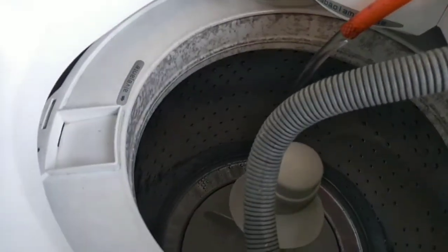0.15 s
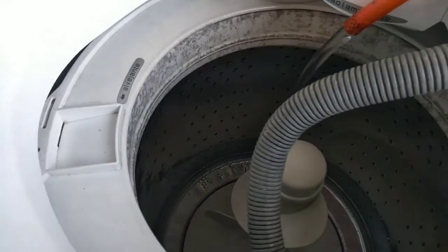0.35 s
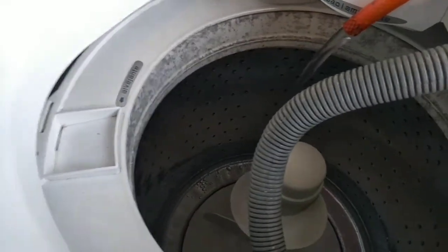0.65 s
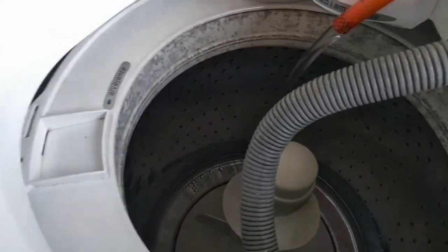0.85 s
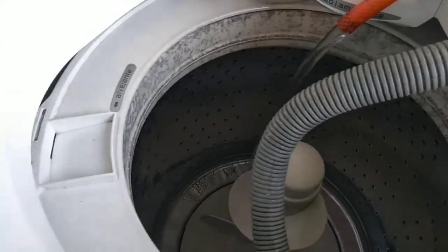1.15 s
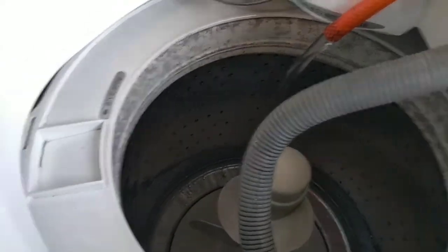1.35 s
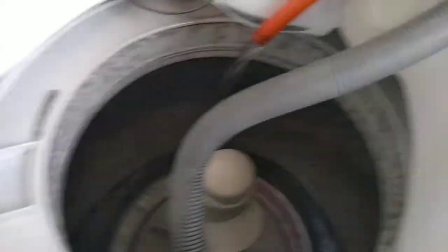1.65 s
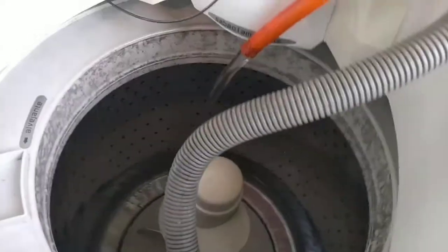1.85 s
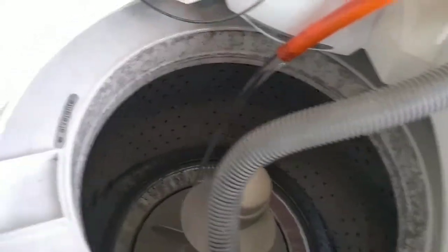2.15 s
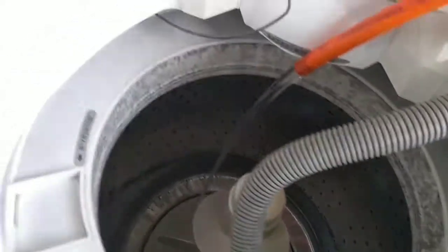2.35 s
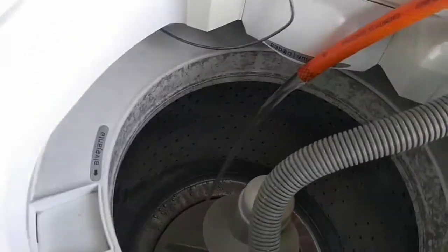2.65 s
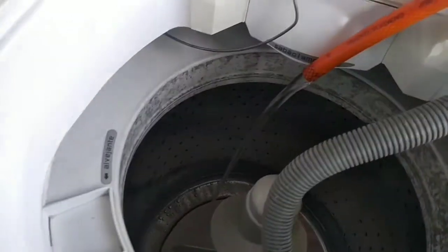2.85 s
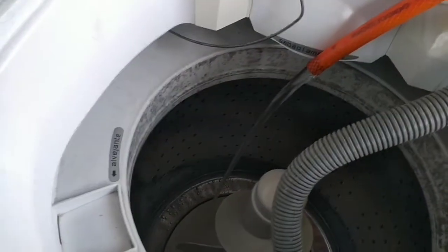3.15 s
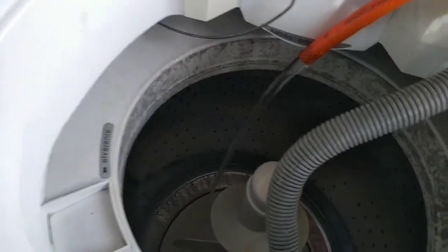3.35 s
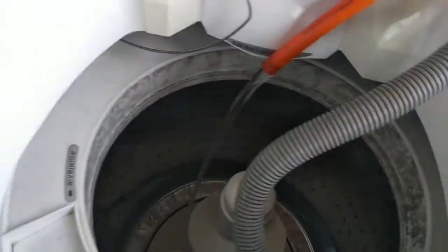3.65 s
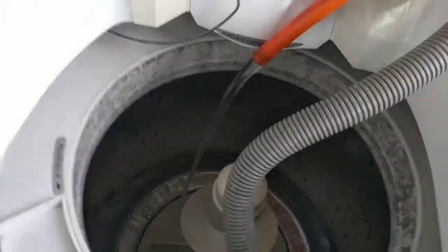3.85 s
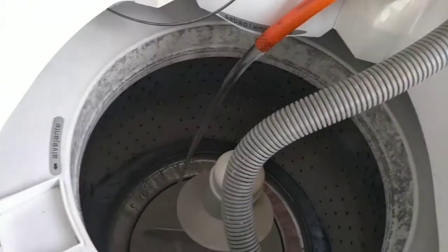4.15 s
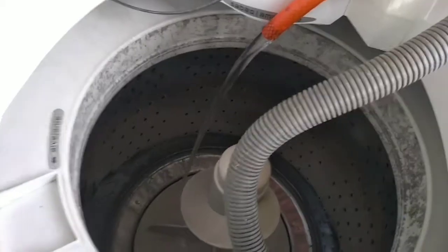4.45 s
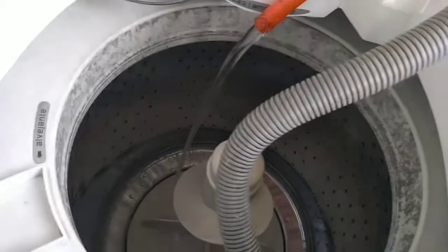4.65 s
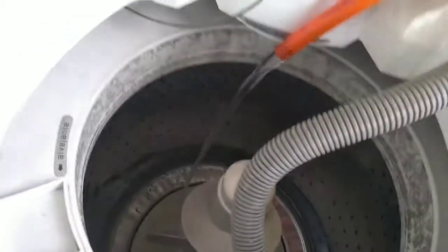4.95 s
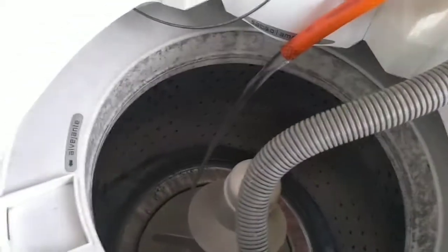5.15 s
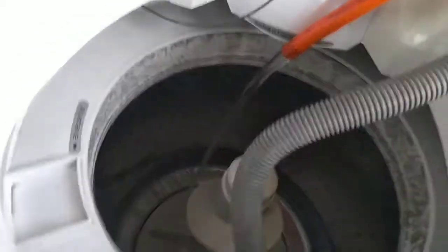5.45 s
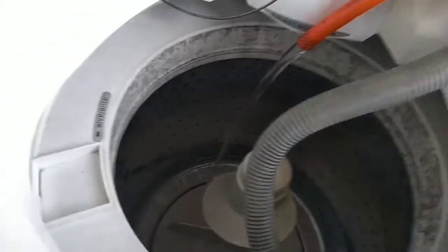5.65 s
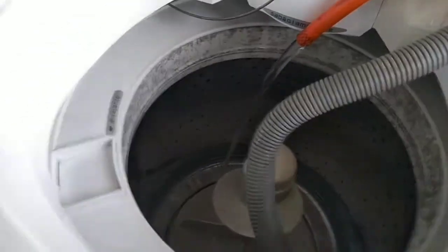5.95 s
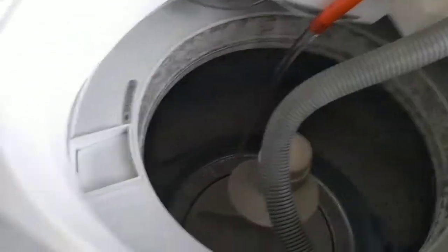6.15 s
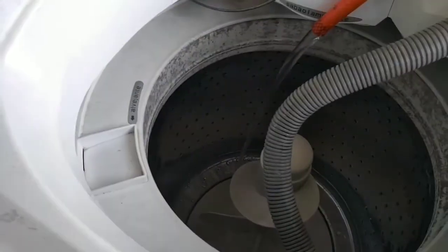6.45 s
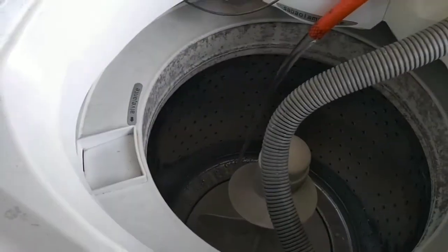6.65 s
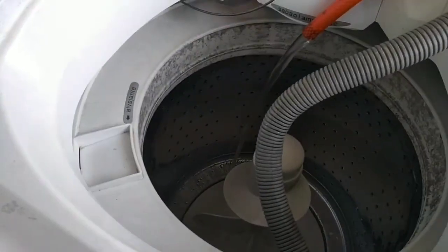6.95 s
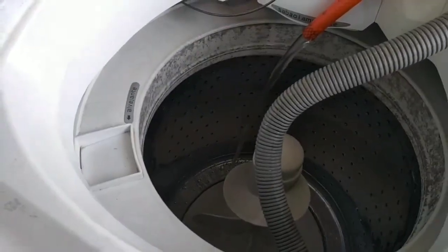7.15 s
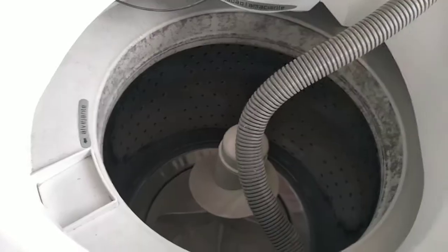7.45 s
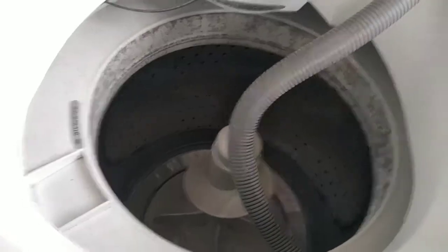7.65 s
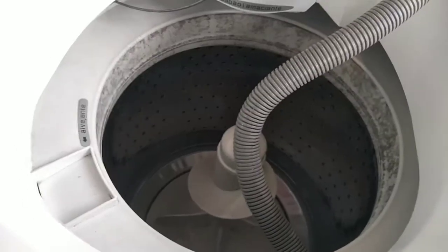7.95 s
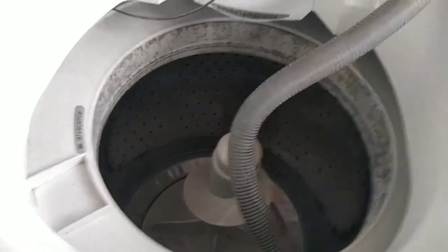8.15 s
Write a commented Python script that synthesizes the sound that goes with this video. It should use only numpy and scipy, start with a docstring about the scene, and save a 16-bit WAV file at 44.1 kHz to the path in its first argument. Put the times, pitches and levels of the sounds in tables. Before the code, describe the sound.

A hose jet splashes and gurgles loudly into a hollow washing tub, a bird chirping nearby, then breaks off abruptly to a quiet yard with whistles.

```python
"""Hose jet into a washing machine tub

Close at the tub: a hose jet pours into shallow water; plops, gulps, spray and bubbles ring the drum's air
modes. A bird nearby gives seven chirps, each a short note and a gliding flick, then whistles in pitch arches.
The sound breaks off into a near-silent moment; after it only the quiet yard is heard, with bird, two drips,
insect hiss, one pulsing insect and a low hum from far away. Two microphone ports, widened in the recorder."""
import sys
import numpy as np
from scipy import signal
from scipy.fft import rfft, irfft, next_fast_len
from scipy.io import wavfile
from scipy.ndimage import uniform_filter1d

SR = 44100
rng = np.random.default_rng(int(sys.argv[2]) if len(sys.argv) > 2 else 0)


def persist_wave(psi):
    """Save psi, clipped to +-1, as 16-bit WAV."""
    counts = np.round(np.clip(psi, -1, 1) * 32767).astype(np.int16)
    wavfile.write(sys.argv[1], SR, np.atleast_2d(counts).T)


N = 365588
T = np.arange(N) / SR
STOP_S, RESUME_S, FADE_S = 7.228, 7.303, 0.03  # the water has faded out; the yard returns; length of the fade
PORTS_S = 20.7 / SR  # sound travel time between the two microphone ports
SPRAY_T60_S = 0.11  # echo decay of spray and gurgle
SPRAY_ECHO_DB, PLOP_ECHO_DB, SONG_ECHO_DB = 0.5, -2.5, -3  # echoes relative to direct sound


# plop spectrum, before the plop levels: pitch_hz [Hz], level_db [dB per Hz]
PLOP_SPECTRUM = [(30, -81.5), (70, -74.5), (130, -70), (250, -85.5), (450, -83.5), (700, -83.5),
                 (1250, -91), (1700, -97.5), (2500, -95.5), (5000, -108), (14000, -125)]
# spray spectrum, before the spray levels: pitch_hz [Hz], level_db [dB per Hz]
SPRAY_SPECTRUM = [(200, -110), (1000, -87), (2000, -86), (2800, -88), (3300, -88.5), (4200, -82),
                  (5200, -87), (6000, -81.5), (6700, -83.5), (8200, -82.5), (9200, -88.5), (10200, -91.5),
                  (12000, -99), (14500, -100)]


def water():
    """Jet, large splashes, ringing drum, bubbles and a low rumble add up at the two ports."""
    spray_db, plunge_db, boom_db = swells()
    jet_spray, jet_plop = falling_jet(gain_of(spray_db), gain_of(plunge_db))
    big_spray, big_plop = splashes(spray_db=43.8, plop_db=68, scatter=0.22, fall_s=0.005, crack=0.6)
    big_spray = at_ports(big_spray, t60=SPRAY_T60_S, wet_db=SPRAY_ECHO_DB, lead_s=0.000255)
    big_plop = at_ports(big_plop, t60=0.12, wet_db=-2.5, lead_s=0.00006)
    spray = gain_of(-4.5) * jet_spray + big_spray
    plop = gain_of(0.5) * jet_plop + big_plop
    in_drum = drum(drops(per_s=700, spread_db=1), boom_db) + gulps()
    boom = at_ports(in_drum, t60=0.08, wet_db=-9, lead_s=0.00008)
    rumble_spectrum = [(25, -89.0), (100, -81.0), (250, -92.5), (700, -105), (3000, -130)]  # Hz, dB per Hz
    rumble = colour(rng.standard_normal((2, N)), rumble_spectrum)
    return colour(spray, SPRAY_SPECTRUM) + colour(plop, PLOP_SPECTRUM) + boom + gurgle() + rumble


PUFF_S = 0.006  # decay time of a puff of spray


def falling_jet(spray_gain, plunge_gain, spots=3):
    """The jet breaks into blobs that land on a few spots; each plops and throws up a puff of spray."""
    puff = np.exp(-np.arange(3000) / SR / PUFF_S)
    spray, plop = np.zeros((2, N)), np.zeros((2, N))
    for _ in range(spots):  # each spot has echoes of its own
        blobs = drops(per_s=30, spread_db=2)
        puffs = evened(convolve(abs(blobs), puff)[0])
        droplets = drops(per_s=1700, spread_db=4.5)
        patter = evened(droplets * (puffs + 0.65)) + 0.3 * blobs
        # the finest drops merge into a hiss
        patter = patter + 0.35 * rng.standard_normal(N)
        pings = pinged(patter, width_hz=570) * spray_gain
        spray += at_ports(pings, t60=SPRAY_T60_S, wet_db=SPRAY_ECHO_DB, lead_s=0.000317)
        lesser_blobs = drops(per_s=55, spread_db=3.5)
        plunge = 0.8 * blobs + 0.55 * lesser_blobs + 0.15 * rng.standard_normal(N)
        plop += at_ports(plunge * plunge_gain, t60=0.17, wet_db=PLOP_ECHO_DB, lead_s=0.00006)
    return spray / np.sqrt(spots), plop / np.sqrt(spots)


# the wandering jet: time_s [s], spray_swell_db [dB], boom_swell_db [dB]
JET_SWELLS = [(0.0, 1, 1.5), (0.9, -0.5, 3), (1.3, -1.5, 0), (1.9, -1.6, 0), (2.3, 1, -1.5), (2.6, 2.5, 1),
              (3.1, -0.5, -1), (3.7, 0, 1.5), (4.3, -0.5, -0.5), (5.1, 0.8, 3.5), (5.4, -1, -3),
              (5.8, 0.5, 0), (6.15, 0, -2.5), (6.38, 0, -2), (6.62, 0, -3.5), (7.2, 1, -4)]
PLUNGE_DB_PER_S = -0.88  # the jet's plops soften as the water deepens


def swells():
    """Spray and boom swell as the jet wanders, plops fade as the tub fills: three dB curves."""
    spray_db, boom_db = follow(JET_SWELLS)
    plunge_db = PLUNGE_DB_PER_S * (T - STOP_S / 2)
    return spray_db, plunge_db, boom_db


# the loudest splashes, levels relative: start_s [s], slap_db [dB], ping_hz [Hz], plop_db [dB]
LOUD_SPLASHES = [(0.1397, -17.5, 7800, -39), (0.2278, -23, 3120, -35.5), (0.2533, -29, 8000, -36),
                 (0.281, -21.5, 8150, -38.5), (0.4395, -28, 7960, -38.5), (0.5816, -20.5, 6300, -41),
                 (0.6475, -24, 8400, -36.5), (0.6626, -21.5, 7800, -40), (0.775, -19.5, 5800, -38),
                 (0.7903, -24, 3240, -38), (0.891, -35, 4000, -35.5), (0.9682, -26, 4500, -35.5),
                 (1.005, -24.5, 7500, -44), (1.143, -21, 6000, -39), (1.375, -21.5, 7600, -41),
                 (1.5549, -16, 7200, -34), (1.63, -26, 4030, -36), (1.6784, -20.5, 4430, -43),
                 (1.714, -28, 4600, -34.5), (1.9465, -19.5, 5000, -32.5), (2.1488, -27, 2880, -35.5),
                 (2.356, -20.5, 7700, -39), (2.372, -22, 6600, -36.5), (2.497, -36, 4000, -37),
                 (2.5248, -40, 3980, -39), (2.556, -37, 4000, -36.5), (2.710, -34, 3500, -34.5),
                 (2.719, -31, 7400, -38), (2.767, -44, 6500, -35), (3.145, -33, 4000, -35),
                 (3.2151, -22, 7100, -35), (3.474, -23, 7550, -52), (3.501, -21.5, 4100, -43),
                 (3.539, -23.5, 4500, -34.5), (3.647, -32, 4000, -34.5), (3.6535, -21, 8000, -36),
                 (3.699, -36, 4000, -41), (3.818, -25, 7400, -35), (3.858, -27, 5200, -37.5),
                 (3.9707, -30, 5500, -35.5), (4.261, -23, 3900, -39), (4.285, -32, 4000, -37),
                 (4.494, -23.5, 3580, -38), (4.8478, -31, 3715, -32), (4.887, -33, 4000, -33),
                 (4.954, -24, 5500, -43), (4.9678, -23.5, 7640, -39), (5.092, -20.5, 9000, -38),
                 (5.1692, -15.5, 7440, -34), (5.213, -30, 4000, -36.5), (5.282, -32, 4000, -35),
                 (5.331, -26, 5500, -36), (5.382, -33, 2500, -33), (5.447, -27.5, 3500, -36.5),
                 (5.5285, -21, 9200, -50), (5.540, -19, 8000, -46), (5.5615, -19.5, 4930, -37),
                 (5.7467, -15, 8700, -35), (6.033, -20, 5830, -46), (6.1304, -24.5, 5200, -42),
                 (6.402, -19.5, 5950, -47), (6.4415, -21, 7600, -48), (6.925, -22.5, 4100, -34),
                 (7.157, -20, 3920, -41)]
CRACKLE, CRACKLE_S = 0.16, 0.001  # share and decay time of the crackle at impact


def splashes(spray_db, plop_db, scatter, fall_s, crack):
    """A big blob slaps the water, crackles and pings, then droplets patter down: spray and plop drives."""
    spray, plop = np.zeros(N), np.zeros(N)
    t = np.arange(3000) / SR
    for start_s, slap_db, ping_hz, low_db in LOUD_SPLASHES:
        droplets = scatter * (rng.random(len(t)) < 0.06) * np.exp(-t / fall_s)
        crackle = CRACKLE * np.exp(-t / CRACKLE_S)
        burst = rng.standard_normal(len(t)) * (droplets + crackle)
        burst[0] = 0.7  # the slap itself
        pings = np.convolve(burst, ping(ping_hz, ping_hz / 5))[:len(t)]
        add(spray, start_s, gain_of(slap_db + spray_db) * (crack * burst + pings))
        add(plop, start_s, gain_of([low_db + plop_db]))
    return spray, plop


# how far the listener leans over the opening: time_s [s], lean [share 0-1]
LISTENER_LEAN = [(2.3, 0.4), (2.6, 0.75), (3.3, 0.9)]
# air modes of the drum, levels before swell and slosh:
# pitch_hz [Hz], width_hz [Hz], rim_db beside the rim [dB per Hz], over_db over the opening [dB per Hz]
DRUM_MODES = [(108.3, 14.1, -58, -55), (138.3, 26, -62.5, -64.5), (189, 14, -70, -60.5),
              (324.6, 29, -83, -69), (359, 59, -94.5, -68.5), (390, 55, -97, -67.5), (501, 22, -77, -76.5),
              (624, 64.4, -73.5, -78.5), (691.7, 48, -78, -79), (1017, 28, -101, -102),
              (1129, 52, -79, -82), (1260, 34.5, -81, -80.5), (1561, 67, -85, -96)]
DEEP_HZ, UPPER_SWELL = 260, 0.27  # modes from this pitch up follow only this share of the boom's swell
MODE_BEND, SLOSH_DB = 0.014, 0.8  # sloshing shifts pitch (rms share) and level (rms dB) of each mode


def drum(drive, swell_db):
    """The jet rings the drum's air; sloshing bends and swells each mode, leaning over brings out others."""
    lean = np.clip(follow(LISTENER_LEAN)[0], 0, 1)
    out = np.zeros(N)
    for hz, width_hz, rim_db, over_db in DRUM_MODES:
        bend, slosh = wander(0.06), wander(0.07)
        turn = np.exp(2j * np.pi * hz * np.cumsum(1 + MODE_BEND * bend) / SR)
        r = np.exp(-np.pi * width_hz / SR)
        # shift the mode down to 0 Hz, smooth with a double pole, shift back up
        smooth = signal.lfilter([(1 - r) ** 2], [1, -2 * r, r * r], drive * turn.conj())
        ring = 2 * (turn * smooth).real
        share = 1 if hz < DEEP_HZ else UPPER_SWELL
        level_db = rim_db + lean * (over_db - rim_db) + share * swell_db + SLOSH_DB * slosh
        out += ring * gain_of(level_db)
    return out * np.sqrt(SR / 2)


# gulps of air dragged under by the jet, pitch before its wobble:
# peak_s [s], length_s [s], pitch_hz [Hz], level_db [dB before echoes]
AIR_GULPS = [(1.25, 0.34, 114.4, -45), (2.32, 0.24, 188.4, -51), (3.3, 0.24, 109.6, -42.5),
             (3.297, 0.16, 396, -58), (3.542, 0.18, 385.3, -48), (3.69, 0.26, 109.4, -38.5),
             (3.688, .14, 352.3, -48), (4.15, .2, 194, -51), (4.33, .25, 107.6, -44),
             (4.349, .09, 389, -48), (4.731, 0.13, 409.2, -49.5), (4.76, .16, 189.8, -46),
             (4.819, 0.27, 108.2, -46), (4.973, .16, 385.5, -50), (5.08, 0.31, 189, -42),
             (5.108, 0.19, 370, -49), (5.22, .22, 108, -40), (5.52, .2, 107, -44), (5.53, .1, 396, -50),
             (5.66, .14, 186, -51), (5.849, .16, 390, -49), (6.018, .1, 379.5, -48.5),
             (6.378, .34, 109, -39), (6.668, .09, 365, -45.5), (6.99, 0.23, 392, -51.5)]
GULP_WOBBLE, GULP_WOBBLE_S = 0.03, 0.02  # rms share of the pitch, and time step


def gulps():
    """A pocket of air swells, wobbles and collapses, sounding near one of the drum's modes."""
    out, wobble = np.zeros(N), wander(GULP_WOBBLE_S)
    for peak_s, length_s, hz, db in AIR_GULPS:
        swell = np.hanning(round(length_s * SR))
        pitch_hz = hz * (1 + GULP_WOBBLE * wobble[round(peak_s * SR):][:len(swell)])
        add(out, peak_s - length_s / 2, swell * tone(pitch_hz, db, waver=0.03))
    return out


def gurgle():
    """Many small ringing bubbles, fewer deep glugs and single large bubbles share the tub's echoes."""
    ringing = bubbles(per_s=300, low_hz=700, high_hz=8500, cycles=9, rise=0.012)
    glugs = bubbles(per_s=45, low_hz=480, high_hz=1700, cycles=6, rise=0.025)
    mixed = gain_of(-62.5) * ringing + gain_of(-64) * glugs + blips()
    return at_ports(mixed, t60=SPRAY_T60_S, wet_db=1, lead_s=0.00006)


def bubbles(per_s, low_hz, high_hz, cycles, rise):
    """Trapped air rings for some cycles and rises in pitch on its way up; rms 1."""
    out = np.zeros(N)
    for when, pitch, size in rng.random((round(per_s * N / SR), 3)):
        hz = low_hz * (high_hz / low_hz) ** pitch
        age = np.arange(int(5 * cycles * SR / hz)) * hz / SR / cycles  # in decay times
        ring = np.exp(-age) * np.sin(2 * np.pi * cycles * (age + rise * age ** 2))
        add(out, when * N / SR, size ** 4 * ring)
    return evened(out)


# large single bubbles: start_s [s], pitch_hz at the start [Hz], level_db before the swell [dB]
LARGE_BUBBLES = [(1.504, 1033, -43), (2.437, 1490, -35.5), (2.520, 617, -31.5), (2.695, 860, -37),
                 (3.775, 1250, -38), (3.778, 3050, -38), (4.493, 1590, -34.5), (5.174, 2720, -34),
                 (6.147, 1500, -32.5), (6.174, 2640, -34), (6.209, 3330, -39), (6.221, 1490, -37.5),
                 (6.430, 2660, -33), (6.821, 3360, -34.5), (7.069, 2760, -38)]
BLIP_ATTACK_S, BLIP_DECAY_S, BLIP_RISE_PER_S = 0.0009, 0.0033, 0.8


def blips():
    """Single large bubbles stand out of the gurgle: a quick swell and a short rising ring."""
    out, t = np.zeros(N), np.arange(SR // 25) / SR
    for start_s, hz, db in LARGE_BUBBLES:
        swell = (1 - np.exp(-t / BLIP_ATTACK_S)) * np.exp(-t / BLIP_DECAY_S)
        ring = np.sin(2 * np.pi * hz * t * (1 + BLIP_RISE_PER_S * t))
        add(out, start_s, gain_of(db) * swell * ring)
    return out


def ping(hz, width_hz):
    """The tiny air pocket under a droplet rings for a few cycles; energy 1."""
    t = np.arange(256) / SR
    ring = np.exp(-np.pi * width_hz * t) * np.cos(2 * np.pi * hz * t)
    return ring / np.linalg.norm(ring)


def pinged(clicks, width_hz, count=14):
    """Every click rings an air pocket with one of several pitches, drawn at random; rms 1."""
    pocket = rng.integers(0, count, N)
    out = np.zeros(N)
    for k, hz in enumerate(np.linspace(1500, 13500, count)):
        out += signal.oaconvolve(clicks * (pocket == k), ping(hz, width_hz))[:N]
    return evened(out)


def drops(per_s, spread_db):
    """Drops land at random as clicks of uneven size; rms 1."""
    size = gain_of(spread_db * np.clip(rng.standard_normal(N), -3, 2))
    sign = rng.choice([-1, 1], N)
    lands = rng.random(N) < per_s / SR
    return evened(size * sign * lands)


def bird():
    """The nearby bird's sharp chirps and softer whistles are thrown back by nearby walls."""
    chirped = off_wall(chirps(), delay_s=0.0031, share=0.4)
    whistled = off_wall(whistles(), delay_s=0.0042, share=0.3)
    chirped = at_ports(chirped, t60=0.16, wet_db=0.5, lead_s=0.00005)
    whistled = at_ports(whistled, t60=0.41, wet_db=SONG_ECHO_DB, lead_s=0.00003)
    return gain_of(-3.0) * chirped + gain_of(1.0) * whistled


# a short note, then a steep downward flick; nominal note pitch, levels before the bird's mix:
# flick_start_s [s], note_hz [Hz], note_db [dB], flick_top_hz [Hz], flick_end_hz [Hz], flick_db [dB]
BIRD_CHIRPS = [(2.026, 2620, -46, 5040, 4100, -36.5), (2.233, 3070, -33.5, 4570, 3310, -33),
               (2.430, 3290, -40.5, 4890, 3500, -32), (2.675, 3205, -33, 4270, 3290, -36.5),
               (2.888, 3136, -36.5, 4100, 3200, -35), (3.087, 3143, -37, 4750, 3370, -33),
               (3.306, 2885, -45, 4640, 3700, -33)]
NOTE_S, FLICK_S = 0.024, 0.021
NOTE_RASP, FLICK_RASP = 0.052, 0.08  # rms pitch tremble, share of the pitch


def chirps():
    """Each chirp is a slightly arched, raspy note that leads straight into a falling flick."""
    out = np.zeros(N)
    for start_s, note_hz, note_db, top_hz, end_hz, flick_db in BIRD_CHIRPS:
        arch = np.sin(np.pi * np.linspace(0, 1, int(NOTE_S * SR)))
        note = tone(note_hz * (0.95 + 0.064 * arch), note_db, waver=NOTE_RASP)
        add(out, start_s - NOTE_S, arch * note)
        u = np.linspace(0, 1, int(FLICK_S * SR))
        flick = tone(top_hz + (end_hz - top_hz) * u, flick_db, waver=FLICK_RASP)
        add(out, start_s, np.sin(np.pi * u) ** 0.48 * flick)
    return out


# whistled arches, levels before shaping and the bird's mix:
# start_s [s], rise_s [s], fall_s [s], start_hz [Hz], top_hz [Hz], end_hz [Hz], level_db [dB]
BIRD_WHISTLES = [(6.775, 0.038, 0.028, 2380, 3250, 2650, -58), (6.84, 0.012, 0.049, 2680, 2860, 2130, -56),
                 (6.956, 0.066, 0.066, 2370, 3420, 2370, -54),
                 (7.295, 0.024, 0.03, 2480, 3180, 2700, -73.5), (7.35, 0.014, 0.032, 2700, 2870, 2170, -64),
                 (7.455, .063, 0.071, 2340, 3420, 2380, -64), (7.665, 0.0064, .026, 2640, 2800, 2300, -64),
                 (7.695, 0.031, .066, 2270, 2830, 2470, -55),
                 (7.843, .047, 0.0267, 2380, 3065, 2610, -56.5),
                 (7.911, 0.027, 0.029, 2650, 2770, 2230, -50.5),
                 (8.029, 0.071, 0.081, 2290, 3280, 2270, -54.5),
                 (8.058, .03, 0.0088, 7000, 9200, 8500, -64.5), (8.21, .01, .043, 6920, 8830, 7750, -71)]
FLUTTER_DB, FLUTTER_S = 1.8, 0.01  # rms level flutter, and its smoothing time


def whistles():
    """Whistled arches whose strength flutters at random."""
    out = np.zeros(N)
    for start_s, *shape in BIRD_WHISTLES:
        add(out, start_s, whistle(*shape))
    flutter = evened(uniform_filter1d(rng.standard_normal(N), round(FLUTTER_S * SR)))
    return out * gain_of(FLUTTER_DB * flutter)


ARCH_ROUNDNESS = 1.45  # 1 = pointed, 2 = parabola
THIN_TOP_DB, CRESCENDO_DB = -7, 3  # a whistle thins at its top and grows towards its end


def whistle(rise_s, fall_s, start_hz, top_hz, end_hz, db):
    """The pitch climbs to a rounded top and comes down again."""
    t = np.arange(0, rise_s + fall_s, 1 / SR)
    from_top = np.interp(t, [0, rise_s, rise_s + fall_s], [1, 0, 1])
    arch = 1 - from_top ** ARCH_ROUNDNESS
    foot_hz = np.where(t < rise_s, start_hz, end_hz)
    pitch_hz = foot_hz + (top_hz - foot_hz) * arch
    level_db = db + THIN_TOP_DB * arch + CRESCENDO_DB * (t / t[-1] - 0.5)
    return tone(pitch_hz, level_db, waver=0.005) * signal.windows.tukey(len(t), 0.25)


def off_wall(x, delay_s, share):
    """One close reflection breaks a gliding tone into strands."""
    out = x.copy()
    add(out, delay_s, share * x)
    return out / np.hypot(1, share)


# last drips into the tub: start_s [s], pitch_hz [Hz], level_db at the start, before echoes [dB]
LAST_DRIPS = [(7.854, 835, -65), (7.978, 360, -58)]
DRIP_T60_S = 0.06


def drips():
    """Each drip rings briefly in the tub."""
    out, t = np.zeros(N), np.arange(SR // 4) / SR
    for start_s, hz, db in LAST_DRIPS:
        add(out, start_s, tone(np.full(len(t), hz), db - 60 * t / DRIP_T60_S, waver=0.057))
    return at_ports(out, t60=0.2, wet_db=PLOP_ECHO_DB, lead_s=0.00006)


# still outdoor air: pitch_hz [Hz], level_db [dB per Hz]
YARD_AIR = [(25, -81.5), (60, -83.5), (100, -86.5), (200, -92), (350, -95), (600, -105), (1050, -104),
            (1900, -110), (3000, -110), (3800, -114), (6000, -117.5), (8000, -114), (10500, -121),
            (14500, -125)]
# hiss of many insects: pitch_hz [Hz], level_db [dB per Hz]
INSECT_SPECTRUM = [(3300, -140), (4000, -114), (4400, -104), (4900, -103), (5200, -116), (6200, -140)]
# low hum from far away: time_s [s], pitch_hz [Hz], level_db [dB]
FAR_HUM = [(0, 46.4, -81), (7.3, 45.3, -56.5), (7.7, 46, -66.5), (8.0, 48, -55), (8.29, 47.3, -52)]


def yard():
    """Noise for still air and insect hiss, a pulsing insect, and a trembling low tone for the far hum."""
    air = colour(rng.standard_normal((2, N)), YARD_AIR)
    hiss = colour(rng.standard_normal((2, N)), INSECT_SPECTRUM)
    return air + hiss + insect() + tone(*follow(FAR_HUM), waver=0.022)


def insect(top_hz=5460, db=-74):
    """One insect pulses 9.65 times a second; its pitch is highest in the middle of each pulse."""
    beat = np.cos(2 * np.pi * 9.65 * (T - RESUME_S))
    voice = tone(top_hz + 110 * (beat - 1), db + 3 * wander(0.01), waver=0.008)
    return at_ports(np.maximum(beat, 0) * voice, t60=0.073, wet_db=SONG_ECHO_DB, lead_s=0.0001)


def at_ports(x, t60, wet_db, lead_s, size=16384):
    """Direct sound reaches the left port first; echoes from all sides agree only in the bass."""
    t, hz = np.arange(size) / SR, np.fft.rfftfreq(size, 1 / SR)
    decay = gain_of(-60 * t / t60) * (1 - np.exp(-t / 0.0047))
    a, b = rfft(rng.standard_normal((2, size)) * decay / np.linalg.norm(decay))
    same = np.sinc(2 * hz * PORTS_S)  # likeness of the echoes at the two ports
    echoes = np.array([a, same * a + np.sqrt(1 - same ** 2) * b])
    echoes = echoes * hz / (hz + 400)  # less bass
    direct = np.exp(-2j * np.pi * hz * np.array([[PORTS_S], [PORTS_S + lead_s]]))
    direct[1] /= np.sqrt(1 + (hz / 6000) ** 4)  # straight treble barely bends round to the right port
    response = irfft(direct + gain_of(wet_db) * echoes)
    return convolve(x, response / np.sqrt(1 + gain_of(wet_db) ** 2))


def tone(hz, db, waver):
    """A nearly pure voice whose pitch trembles by an rms share of itself."""
    tremble = evened(uniform_filter1d(rng.standard_normal(N), 60))[:len(hz)]
    phase = 2 * np.pi * np.cumsum(hz * (1 + waver * tremble)) / SR
    return np.sqrt(2) * gain_of(db) * np.sin(phase)


def wander(step_s):
    """A slow random curve that takes a new value at every step; rms 1."""
    at = np.arange(0, N / SR + step_s, step_s)
    return evened(np.interp(T, at, rng.standard_normal(len(at))))


def colour(x, spectrum, size=4096):
    """Causal minimum-phase filter that gives unit white noise the spectrum, and keeps clicks sharp."""
    hz = abs(np.fft.fftfreq(size, 1 / SR))
    log_gain = np.log(gain_of(read(spectrum, hz)) * np.sqrt(SR / 2))
    response = np.fft.ifft(np.exp(np.conj(signal.hilbert(log_gain)))).real
    return convolve(x, response[:size // 2])


def convolve(x, response):
    """Filters one or two channels."""
    return signal.fftconvolve(np.atleast_2d(x), np.atleast_2d(response), axes=1)[:, :N]


def add(mix, start_s, sound):
    """Mixes a sound in at its start time."""
    part = mix[max(round(start_s * SR), 0):][:len(sound)]
    part += sound[:len(part)]


def follow(rows):
    """The columns of a time table, drawn out as curves over the whole scene."""
    s, *columns = np.transpose(rows)
    return [np.interp(T, s, column) for column in columns]


def read(points, hz):
    """A spectrum table on a log-frequency axis."""
    f, value = np.transpose(points)
    return np.interp(np.log(hz + 1), np.log(f + 1), value)


def evened(x):
    """Scales to rms 1."""
    return x / np.sqrt(np.mean(x ** 2) + 1e-20)


def gain_of(db):
    """Decibels to amplitude."""
    return 10 ** (np.asarray(db) / 20)


# tilt of the water between the ports, the right mostly shaded from the treble:
# pitch_hz [Hz], left_minus_right_db [dB]
PORT_SHADE = [(50, 1), (200, -2.5), (600, 5), (2500, 9), (4500, 8), (6500, 1.5), (8500, 8), (14000, 8.5)]


def scene():
    """Water over the yard until the break; the yard alone after it, and 32 dB down in between."""
    size = next_fast_len(N, True)
    hz = np.fft.rfftfreq(size, 1 / SR)
    shade = gain_of(read(PORT_SHADE, hz) * np.array([[0.5], [-0.5]]))
    pouring = irfft(rfft(water(), size) * shade, size)[:, :N]
    before = np.clip((STOP_S - T) / FADE_S, 0, 1) ** 2
    after = np.clip((T - RESUME_S) / 0.00052, 0, 1)
    outdoors = bird() * gain_of([[1.5], [-1.5]]) + yard() + drips()
    return pouring * before + outdoors * np.maximum(before + after, gain_of(-32.0))


# stereo widening, how much of the other channel is subtracted: pitch_hz [Hz], cross [share]
WIDEN_SHARE = [(30, .88), (2100, .97), (4300, .68), (6400, .4), (9000, .17), (12000, .02)]
EDGE_HZ = 14400  # upper band limit


def record(dry):
    """Stereo widening takes a delayed copy of each port from the other channel; then the band limit."""
    size = next_fast_len(N + SR, True)
    hz = np.fft.rfftfreq(size, 1 / SR)
    ports = rfft(dry, size)
    cross = np.clip(read(WIDEN_SHARE, hz), 0, 0.97) * np.exp(-2j * np.pi * hz * PORTS_S)
    wide = irfft(ports - cross * ports[::-1], size)[:, :N]
    low_pass = signal.firwin(511, EDGE_HZ, window=("kaiser", 9), fs=SR)
    return signal.oaconvolve(wide, low_pass[None], "same")


dry = scene()
out = record(dry)
persist_wave(out)
```